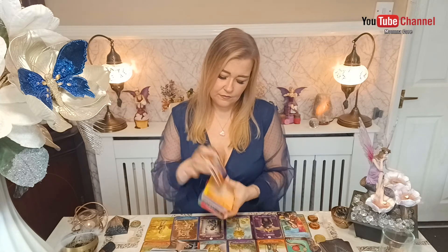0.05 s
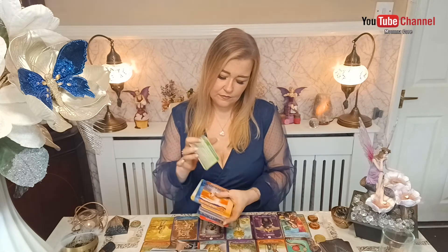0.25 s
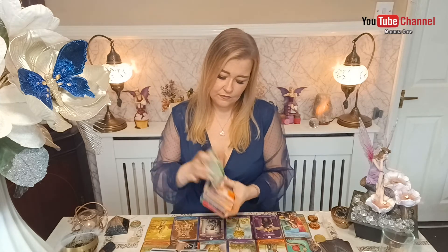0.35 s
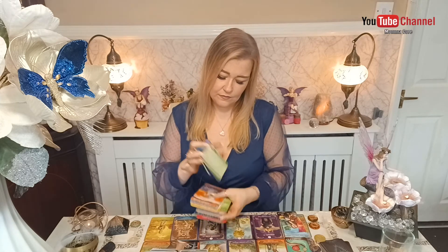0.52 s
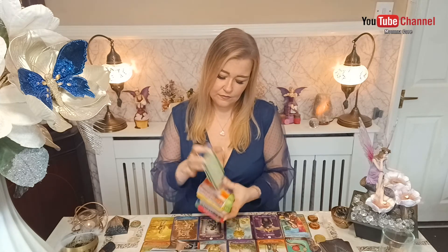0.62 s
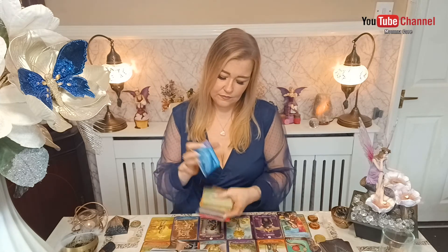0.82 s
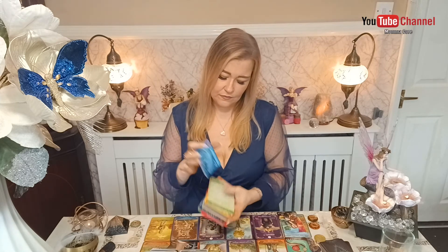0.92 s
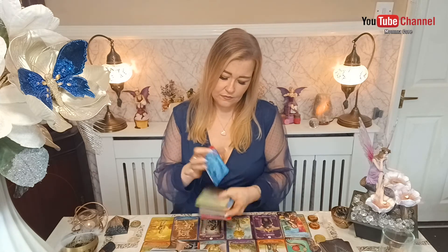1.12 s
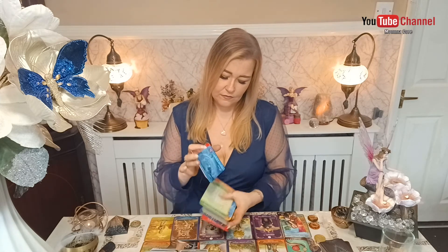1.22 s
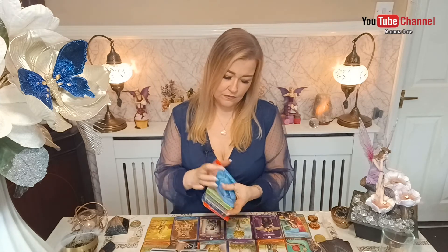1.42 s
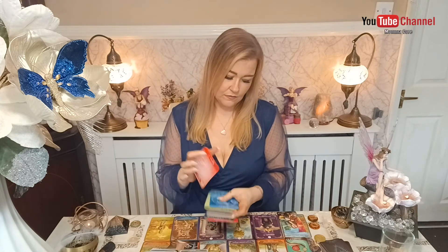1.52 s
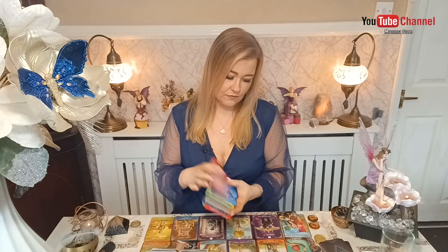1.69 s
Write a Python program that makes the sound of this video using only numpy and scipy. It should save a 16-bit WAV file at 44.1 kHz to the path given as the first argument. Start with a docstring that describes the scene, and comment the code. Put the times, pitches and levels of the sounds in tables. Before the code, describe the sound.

Close up, someone shuffles cards by hand: stroke after stroke brings a short papery slide, crisp slaps and a dull thump in the palm. The harder ones ring briefly in the small room, and the last ones land gently.

```python
"""A deck of large cards is shuffled overhand, close up in a small, live room.
A faint ring dies away over low room noise and hum. Then, stroke after stroke, a packet slides out with
a papery hiss and lands in quick slaps and a soft thump in the palm; the room rings after the hard ones.
Here and there a card edge flicks past another or a bent packet snaps free.
Near the end one slow slide zips upward in a squeak, and a last few soft landings follow."""
import sys
import numpy as np
from scipy import signal
from scipy.fft import rfft, irfft
from scipy.io import wavfile
from scipy.ndimage import uniform_filter1d

SR = 44100
rng = np.random.default_rng(int(sys.argv[2]) if len(sys.argv) > 2 else 0)


def dump_mix(stems):
    """Bounce the given channels to the path in sys.argv[1] as a 16-bit WAV at rate SR."""
    frames = np.atleast_2d(stems).T  # one column per channel
    limited = np.clip(frames, -1, 1)  # hard clip at full scale
    pcm = np.round(limited * 32767).astype(np.int16)
    wavfile.write(sys.argv[1], SR, pcm)


N = 77175

# card faces sliding over each other: start t/s, peak t/s, end t/s, peak level/dB
CARD_SLIDES = [(.077, .088, .125, -33), (.367, .374, .42, -37), (.654, .664, .725, -38),
               (1.674, 1.679, 1.72, -40), (.1, .178, .235, -42), (.2, .207, .222, -27),
               (.42, .472, .49, -35), (.695, .762, .81, -40), (.97, 1.035, 1.1, -45),
               (1.055, 1.081, 1.102, -35), (1.31, 1.314, 1.42, -48), (1.37, 1.472, 1.492, -39),
               (1.7, 1.716, 1.79, -43)]
# packets landing: t/s, knock level/dB, clap level/dB, clap f/Hz, clap decay/ms, edge tick level/dB
PACKET_SLAPS = [(0.0805, -36.5, -29.5, 1160, 2.5, -37.5), (0.2088, -18, -23.5, 2390, 3.6, -43),
                (0.2108, -19.5, -22, 1070, 0.86, -37), (0.217, -24, -25, 2320, 1.2, -28),
                (0.219, -24.5, -18.5, 1440, .8, -44), (0.2332, -22.5, -16, 3130, 0.2, -16),
                (0.3673, -37, -31.5, 1600, 1.1, -36), (0.3847, -34.5, -28.5, 1250, 0.33, -50),
                (0.4644, -42, -28, 1700, 0.46, -32.5), (0.4795, -39, -25.5, 2410, 2.1, -41),
                (0.6611, -34, -31.5, 1490, 0.33, -38.5), (0.7668, -25, -32, 1720, 4, -53),
                (0.7804, -29, -22.5, 2000, 1, -35), (0.7838, -22.5, -14, 2020, 1.07, -46),
                (0.7977, -25.5, -15.5, 2680, 2.9, -36), (0.8076, -19.5, -29, 2760, 0.85, -19.5),
                (0.9931, -34.5, -34, 1170, 1.6, -45.5), (1.01, -30, -28, 1270, 0.62, -46.5),
                (1.0754, -44, -30.5, 1580, 0.42, -36.5), (1.0934, -35, -29.5, 2700, 1.8, -40),
                (1.3473, -40.5, -35.5, 2450, 0.4, -40.5), (1.4925, -32.5, -37.5, 2500, 0.62, -39.5),
                (1.675, -39.5, -36.5, 1500, 7.1, -34.5), (1.7122, -36.5, -32, 1940, 6.8, -40)]
# a single card edge flicking past another: t/s, level/dB
EDGE_FLICKS = [(0.082, -35.5), (0.369, -37), (0.7848, -19), (1.6769, -34.5)]
# the deck pushed into the palm: t/s, level/dB, f/Hz
PALM_THUMPS = [(0.085, -33.5, 260), (0.097, -26.5, 149), (0.207, -18, 158), (.234, -25.5, 95),
               (0.3713, -27.5, 286), (0.388, -24, 157), (0.468, -26.5, 180), (0.487, -29.5, 116),
               (0.663, -30, 196), (0.679, -26, 185), (0.69, -33, 298), (.767, -24.5, 214),
               (0.801, -19, 119), (0.996, -31.5, 190), (1.012, -23, 134), (1.087, -27, 142),
               (1.352, -29, 183), (1.36, -31, 193), (1.497, -27, 162), (1.677, -32.5, 171),
               (1.717, -33.5, 150)]
# a bent packet springing free: t/s, f/Hz, level/dB
PACKET_SNAPS = [(.48, 2295, -20.5), (.7842, 2430, -37), (1.094, 3330, -35.5), (1.494, 1235, -29.5)]

# EQ curves, each: f/Hz, gain/dB
ROOM_TONE_EQ = [(25, -41), (200, -5.5), (600, -14), (1500, -32.5), (16000, -39)]  # low room noise
PAPER_EQ = [(150, 3.5), (700, -1.5), (1500, 7), (2600, 0.5), (4500, -1), (11000, -1.5), (16000, -9)]  # hiss of card on card
KNOCK_EQ = [(100, -10), (260, -5), (550, 0), (1100, -10), (3000, -40)]  # dull body of the deck
CLAP_EQ = [(250, -35.5), (700, 7.5), (1300, 12.5), (4200, 2.5)]  # midrange smack of a packet
EDGE_EQ = [(1500, -11.5), (3500, 6.5), (5000, 1.5), (8000, -1.5), (10000, -8.5), (16000, -20.5)]  # bright tick of card edges
LOOSE_EQ = [(100, -7.5), (330, -1), (800, -14.5), (12000, -35)]  # muffled settling of loose cards
WALL_EQ = [(110, -7), (450, 3.5), (1300, -1), (2500, 1), (5000, -2), (9000, -2), (16000, -1.5)]  # reflections from the walls

EDGE_DECAY_S, TOP_HZ = 0.0013, 16000
ROOM_DB, ROOM_PREDELAY_S, ROOM_T60_S = -9, 0.008, 0.41


def undb(db):
    """Decibels to gain."""
    return 10 ** (np.asarray(db) / 20)


def unit(x):
    """Scale to an rms of 1."""
    return x / np.sqrt(np.mean(x ** 2) + 1e-20)


def equalise(x, curve):
    """Minimum-phase EQ through (f/Hz, gain/dB) points, so nothing rings ahead of an attack."""
    hz, db = np.array(curve, float).T
    size = 4096
    grid_hz = np.maximum(np.fft.rfftfreq(size, 1 / SR), 1)
    gain = undb(np.interp(np.log(grid_hz), np.log(hz), db))
    cepstrum = irfft(np.log(gain))
    cepstrum[1:size // 2] *= 2
    cepstrum[size // 2 + 1:] = 0
    impulse = irfft(np.exp(rfft(cepstrum)))
    return signal.fftconvolve(x, impulse)[:len(x)]


def resonate(x, hz, width):
    """One broad resonance; width is a share of its pitch."""
    return signal.lfilter(*signal.iirpeak(hz, 1 / width, fs=SR), x)


def cut(x, kind, hz, order=2):
    """Butterworth "lowpass" or "highpass"; steeper with a higher order."""
    return signal.sosfilt(signal.butter(order, hz, kind, fs=SR, output="sos"), x)


def add(out, start, sound):
    """Mix a sound in at a time in seconds."""
    i = max(int(start * SR), 0)
    out[i:i + len(sound)] += sound[:max(len(out) - i, 0)]


def contact(decay_s):
    """One sharp hit, then a dying crackle as more card edges land; a longer crackle carries more weight."""
    equal_s = 0.00061  # a crackle with this decay is as strong as the first hit
    t = np.arange(SR // 25) / SR
    edges = rng.standard_normal(len(t)) * rng.random(len(t)) ** 2 * np.exp(-t / decay_s)
    crackle = edges * np.sqrt(decay_s / equal_s / np.sum(edges ** 2))
    crackle[0] += 1
    return crackle


def at_level(x, db, window_s=0.005):
    """Give a transient the energy of this level held over a short window."""
    return x * undb(db) * np.sqrt(window_s * SR / np.sum(x ** 2))


def room_tone(noise_db=-58.5, hum_hz=69.3, hum_db=-58, ring_hz=685, ring_db=-42.5):
    """The bed: low noise, a faint hum and, at the start, the room's dying ring from an earlier stroke."""
    t = np.arange(N) / SR
    hum = np.sqrt(2) * np.sin(2 * np.pi * hum_hz * t)
    ring = unit(resonate(rng.standard_normal(N), ring_hz, width=0.48))
    ring *= undb(-60 * t / ROOM_T60_S)
    noise = unit(equalise(rng.standard_normal(N), ROOM_TONE_EQ))
    return undb(noise_db) * noise + undb(hum_db) * hum + undb(ring_db) * ring


def slides(fade_db=20, grain_db=3, grain_s=0.001):
    """Grainy paper friction that swells as a packet gains speed and fades as it stops."""
    t, power = np.arange(N) / SR, np.zeros(N)
    for start, peak, end, db in CARD_SLIDES:
        from_peak = np.maximum((peak - t) / (peak - start), (t - peak) / (end - peak))
        power += undb(db - fade_db * from_peak) ** 2 * (t > start)
    grain = unit(uniform_filter1d(rng.standard_normal(N), int(grain_s * SR)))
    friction = rng.standard_normal(N) * undb(grain_db * grain)
    return np.sqrt(power) * unit(equalise(friction, PAPER_EQ))


def slaps():
    """Each landing stacks a dull knock of the deck, a clap of the packet and a tick of card edges."""
    out = np.zeros(N)
    for start, knock_db, clap_db, clap_hz, decay_ms, edge_db in PACKET_SLAPS:
        knock = equalise(contact(decay_s=0.0012), KNOCK_EQ)
        clap = equalise(contact(decay_ms / 1000), CLAP_EQ)
        clap = resonate(clap, clap_hz, width=1)
        clap = cut(clap, "lowpass", 1.516 * clap_hz, order=7)
        edge = equalise(contact(EDGE_DECAY_S), EDGE_EQ)
        add(out, start, at_level(knock, knock_db) + at_level(clap, clap_db) + at_level(edge, edge_db))
    return out


def flicks(above_hz=8300):
    """One card edge flicks past another with a thin, very bright click."""
    out = np.zeros(N)
    for start, db in EDGE_FLICKS:
        click = cut(contact(decay_s=0.00053), "highpass", above_hz)
        add(out, start, at_level(cut(click, "lowpass", TOP_HZ), db))
    return out


def thumps(rise_cycles=0.6, sag_per_cycle=0.7, loose_db=-7):
    """The palm cushions the deck: two or three low swings that sag in pitch, while loose cards settle."""
    out = np.zeros(N)
    for start, db, hz in PALM_THUMPS:
        cycles = hz * np.arange(SR // 12) / SR
        swell = cycles / rise_cycles * np.exp(1 - cycles / rise_cycles)
        sagging_hz = hz * (1 + sag_per_cycle * rise_cycles) / (1 + sag_per_cycle * cycles)
        thump = swell * np.sin(2 * np.pi * np.cumsum(sagging_hz) / SR)
        add(out, start, undb(db) * thump)
        loose_cards = equalise(contact(decay_s=0.0074), LOOSE_EQ)
        add(out, start, at_level(loose_cards, db + loose_db))
    return out


def reverb(x, send_db):
    """Dense reflections from near walls, wet only, with a fresh noise tail on every call."""
    t = np.arange(SR * 3 // 4) / SR
    tail = rng.standard_normal(len(t)) * undb(-60 * t / ROOM_T60_S)
    impulse = equalise(unit(tail) / np.sqrt(len(t)), WALL_EQ)
    out = np.zeros(N)
    add(out, ROOM_PREDELAY_S, signal.fftconvolve(x, impulse))
    return undb(send_db) * out


def snaps(overtone_ratio=1.55, overtone_db=-9.5, decay_s=0.0026):
    """A bent packet springs free and rings briefly in two bending modes."""
    out, t = np.zeros(N), np.arange(SR // 25) / SR
    for start, hz, db in PACKET_SNAPS:
        phase = 2 * np.pi * hz * t
        modes = np.sin(phase) + undb(overtone_db) * np.sin(overtone_ratio * phase)
        add(out, start, at_level(modes * np.exp(-t / decay_s), db))
    return out


def flaps(pitch_ratio=1.09, width=0.46, trim_db=-0.5):
    """A snapping packet also flaps sideways, in a broad band that arrives only by way of the walls."""
    out = np.zeros(N)
    for start, snap_hz, snap_db in PACKET_SNAPS:
        flap = contact(EDGE_DECAY_S)
        for _ in range(2):  # two passes for steeper skirts
            flap = resonate(flap, pitch_ratio * snap_hz, width)
        add(out, start, at_level(flap, snap_db + trim_db))
    return out


def squeak(start_s=1.435, end_s=1.477, from_hz=5800, to_hz=14800, flutter_hz=1100, db=-39.5):
    """One slow slide zips upward in pitch as the free length of the card shortens."""
    progress = np.linspace(0, 1, int((end_s - start_s) * SR))
    hz = 1 / ((1 - progress) / from_hz + progress / to_hz)
    sweep = np.sin(2 * np.pi * np.cumsum(hz) / SR)
    flutter = unit(cut(rng.standard_normal(N), "lowpass", flutter_hz))[-len(progress):]
    late_swell = np.sqrt(2 * np.abs(np.sin(np.pi * progress ** 3)))
    out = np.zeros(N)
    add(out, start_s, undb(db) * late_swell * flutter * sweep)
    return out


def scene(side_db=-15, side_below_hz=515):
    """The cards sit dead centre; each wall gets its own crackle, and only low reflections add width."""
    handling = flicks() + thumps() + slides() + squeak()
    cards = slaps() + snaps() + handling
    walls = [reverb(slaps() + flaps() + handling, ROOM_DB) for _ in range(3)]
    mid = cards + sum(walls) / np.sqrt(len(walls)) + room_tone()
    side = cut(reverb(cards, side_db), "lowpass", side_below_hz, order=4)
    return np.array([mid + side, mid - side])


def record(dry, low_cut_hz=40, ceiling=0.9):
    """Master chain: roll off the lowest bass, clip just under full scale and cut the top steeply."""
    tight = cut(dry, "highpass", low_cut_hz, order=3)
    top_cut = signal.ellip(10, 0.2, 80, TOP_HZ, fs=SR, output="sos")
    return signal.sosfilt(top_cut, np.clip(tight, -ceiling, ceiling))


dry = scene()
out = record(dry)
dump_mix(out)
```